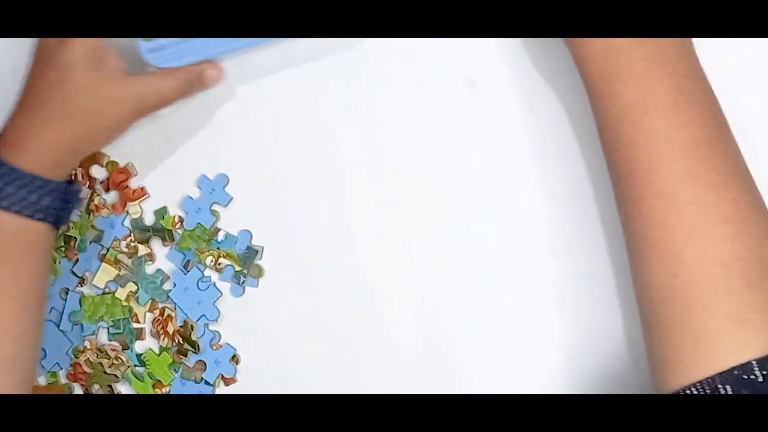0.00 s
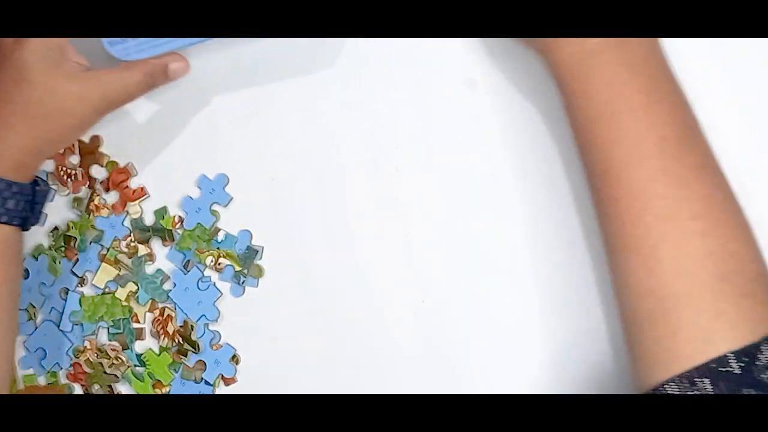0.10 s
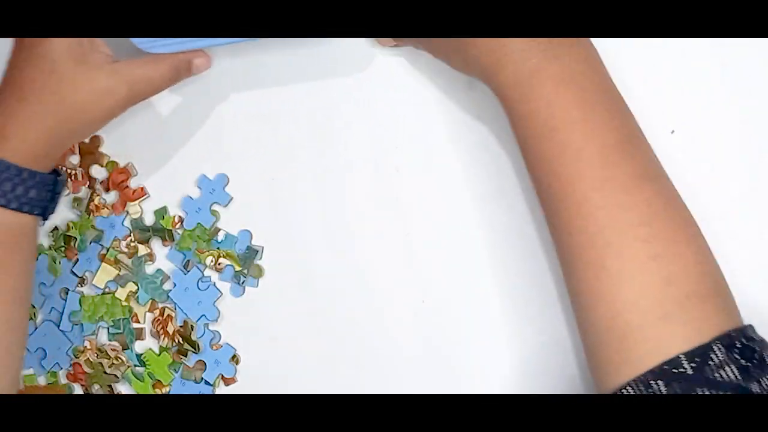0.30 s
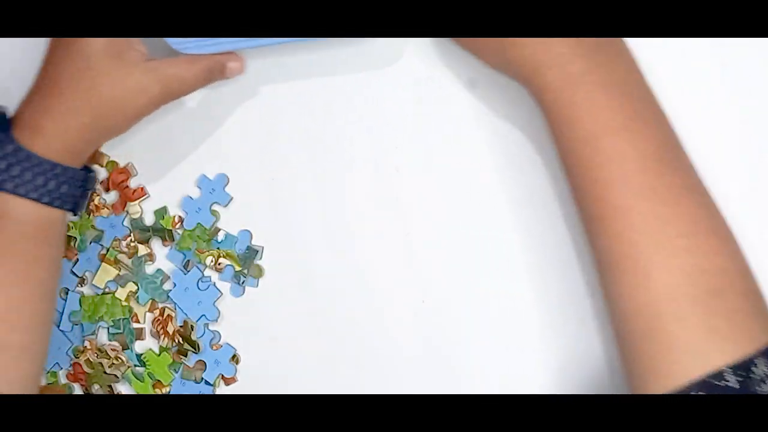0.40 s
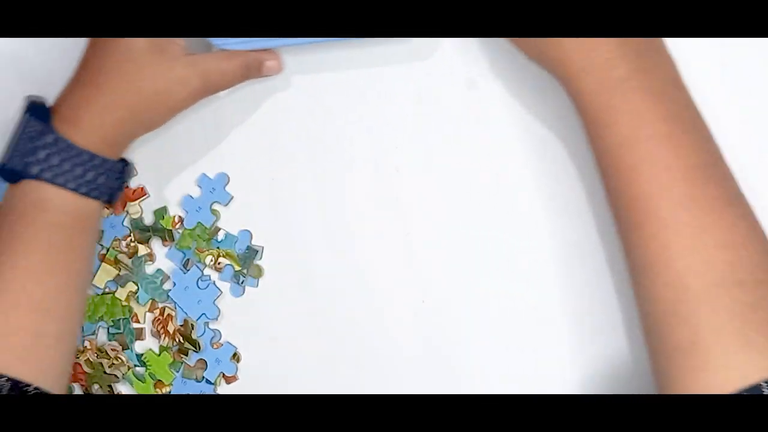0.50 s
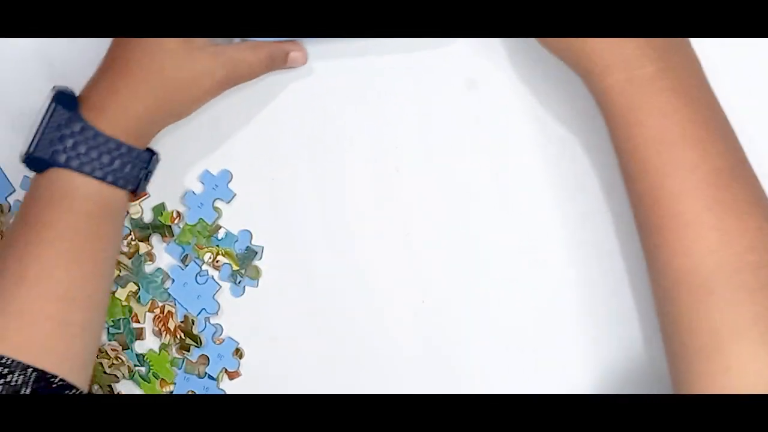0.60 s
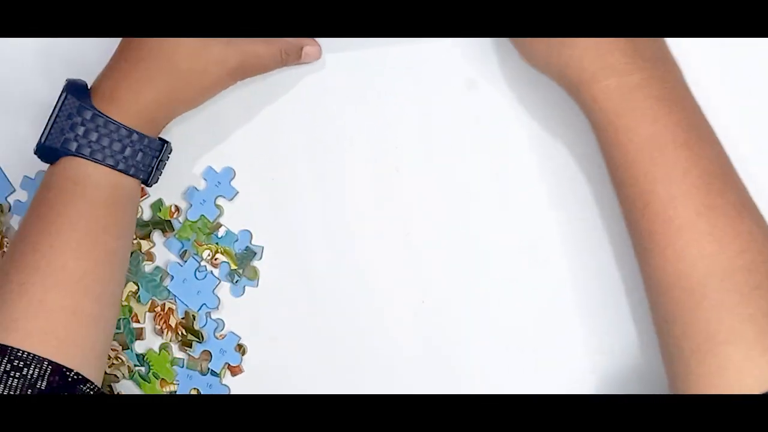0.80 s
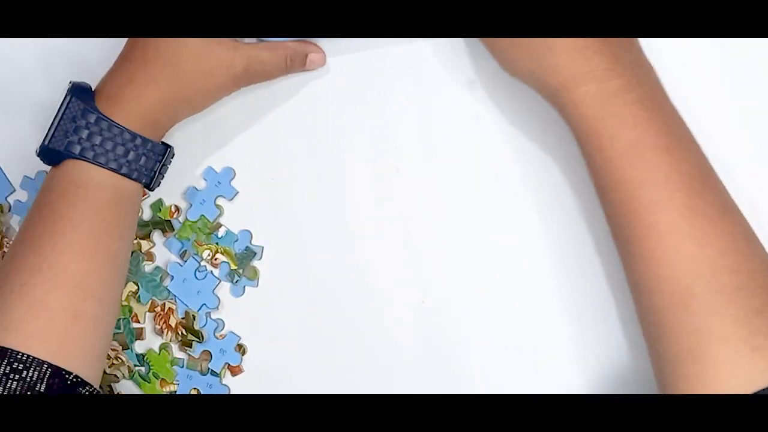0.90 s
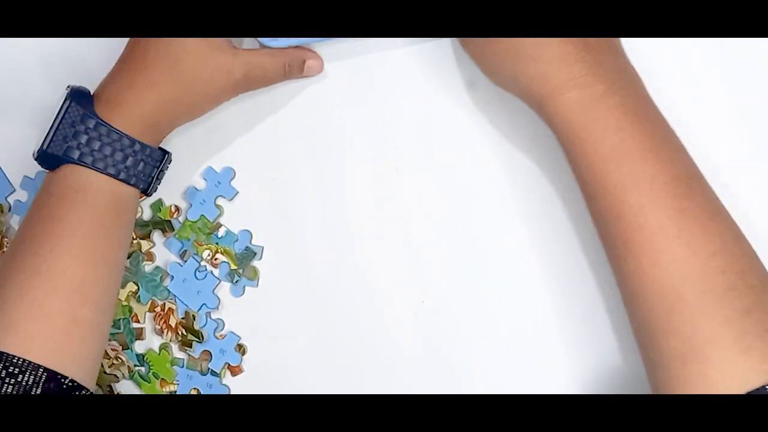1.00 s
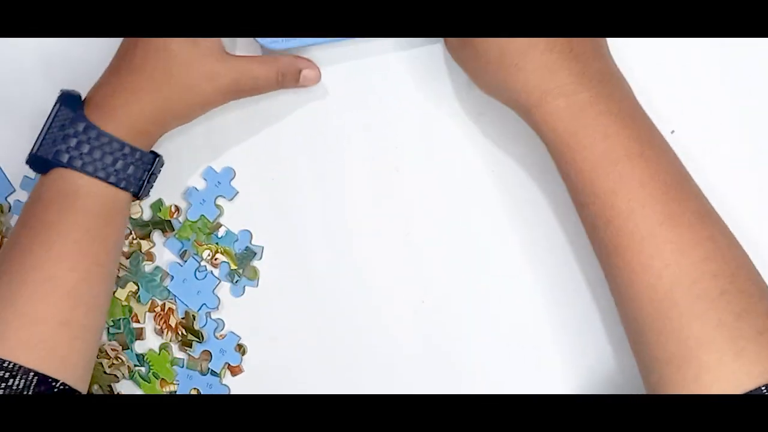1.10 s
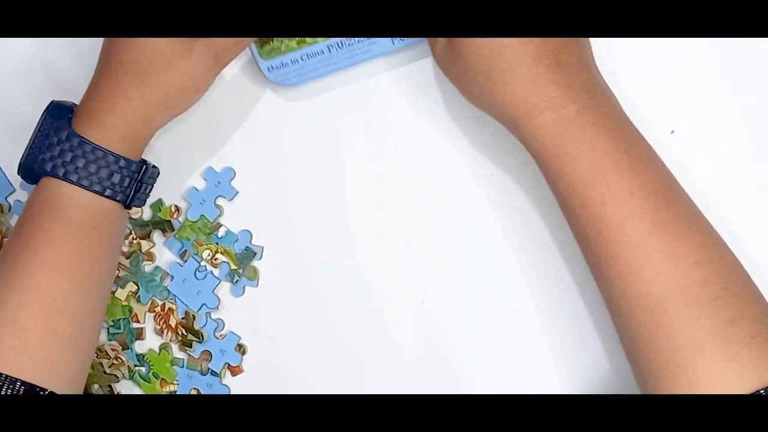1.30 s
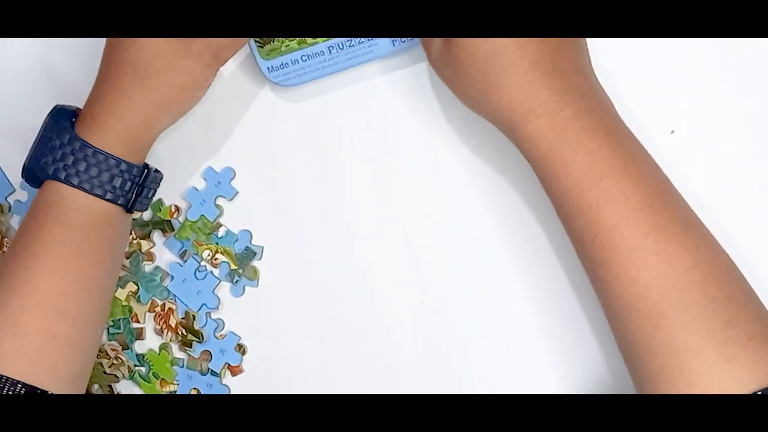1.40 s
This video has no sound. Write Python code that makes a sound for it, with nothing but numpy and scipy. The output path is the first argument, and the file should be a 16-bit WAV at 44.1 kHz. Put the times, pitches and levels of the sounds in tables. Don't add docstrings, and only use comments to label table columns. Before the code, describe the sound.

Plastic box snaps open with five sharp, ringing cracks at a table in a bare room

```python
import sys
import numpy as np
from scipy import signal
from scipy.io import wavfile
from scipy.ndimage import uniform_filter1d

SR = 44100
rng = np.random.default_rng(int(sys.argv[2]) if len(sys.argv) > 2 else 0)


def transcribe(u):
    v = np.clip(np.atleast_2d(u).T, -1, 1)
    q = np.round(v * 32767).astype(np.int16)
    wavfile.write(sys.argv[1], SR, q)


def elevation(decibels):
    levels = np.asarray(decibels, float)
    return 10 ** (levels / 20)


N = 66150


def evened(x):
    return x / np.sqrt(np.mean(x ** 2) + 1e-20)


def read(points, hz):
    f, value = np.transpose(points)
    return np.interp(np.log(hz + 1), np.log(f + 1), value)


def add(mix, s, sound):
    part = mix[round(s * SR):][:len(sound)]
    part += sound[:len(part)]


def colour(x, points, tilt_db=0.):
    hz = abs(np.fft.fftfreq(4096, 1 / SR))
    octaves = np.log2(np.clip(hz, 150, SR) / 2000)
    log_gain = np.log(elevation(read(points, hz) + tilt_db * octaves))
    minimum_phase = np.exp(np.conj(signal.hilbert(log_gain)))
    taps = np.fft.ifft(minimum_phase).real[:2048]
    return signal.fftconvolve(x, taps / np.linalg.norm(taps))


def grit(n):
    grain_db = 4.5 * np.minimum(rng.exponential(1, n), 3.5)
    return evened(rng.standard_normal(n) * elevation(grain_db))


# frequency in Hz, level in dB per Hz.
HISS_COLOUR = [(90, -39), (200, -11), (900, -13), (3200, -21.5), (6800, -9.5), (9400, -17), (12500, -19.5),
               (15600, -24.5)]
HISS_DB = -69


def hiss():
    flicker_db = evened(uniform_filter1d(rng.standard_normal(N), 1500))
    settle = SR // 10
    noise = colour(rng.standard_normal(N + settle), HISS_COLOUR)[settle:][:N]
    return elevation(HISS_DB + flicker_db) * noise


# frequency in Hz, width in Hz, level in dB.
TABLE_MODES = [(53, 17, -3), (72.9, 74, 4.5), (130, 88, -6.5), (210, 39, -10.5), (29.5, 7.5, 4)]
# time in seconds, level in dB.
HAND_WEIGHT = [(0, -9), (.17, -9), (.3, -5), (1.15, 1), (1.23, -8), (1.36, -3)]
RUMBLE_DB = -61


def table_rumble():
    force, rumble = rng.standard_normal(N), np.zeros(N)
    for hz, width_hz, db in TABLE_MODES:
        b, a = signal.iirpeak(hz, hz / width_hz, SR)
        mode = signal.lfilter(b, a, signal.lfilter(b, a, force))
        rumble += elevation(db) * evened(mode)
    weight_db = np.interp(np.arange(N) / SR, *np.transpose(HAND_WEIGHT))
    return evened(rumble) * elevation(RUMBLE_DB + weight_db)


# start in seconds, level in dB, pitch in Hz, time to fall 60 dB in seconds.
THUMPS = [(0.178, -44.5, 168, 0.095), (0.189, -44, 78, 0.2), (0.237, -42, 207, 0.12),
          (0.251, -38.5, 260.5, 0.15), (.248, -41, 357, 0.12), (0.265, -37.5, 130, 0.16),
          (0.252, -37, 57.5, 0.18), (0.3, -40.5, 69.5, 0.3), (0.431, -49.5, 53, 0.3),
          (0.624, -47.5, 210, 0.18), (0.661, -52.5, 162, 0.19), (0.744, -56, 158, 0.18),
          (0.78, -45, 53.4, 0.58), (0.887, -47.5, 53, 0.75), (0.948, -44.5, 247, 0.095),
          (0.974, -40, 65.5, 0.15), (1.142, -52, 49.4, 0.21), (1.3, -61.5, 70, 0.14),
          (1.324, -60.5, 264, 0.086), (1.419, -63, 102, 0.17)]


def table_thumps():
    out, t = np.zeros(N), np.arange(SR // 2) / SR
    for s, level_db, hz, t60 in THUMPS:
        onset = 1 - np.exp(-t * hz / 0.3)
        add(out, s, elevation(level_db - 60 * t / t60) * onset * np.sin(2 * np.pi * hz * t))
    return out


# frequency in Hz, time to fall 60 dB in seconds.
ROOM_DECAY = [(150, .25), (500, 0.35), (1300, 0.41), (3500, 0.38), (7000, 0.3), (14000, 0.17)]
STANDING_HZ = [518, 945, 1040, 1105, 1155, 1325, 1408, 2008, 2051, 2450, 2596, 1790, 4881, 7585]
# level in dB, time to fall 60 dB in seconds.
STANDING = [(1.5, 0.31), (2.5, .45), (3, 0.45), (-3, 0.45), (-10, .4), (-7.5, .55), (-0.5, .5), (1, 0.45),
            (-5, .35), (7.5, 0.18), (-8, 0.68), (3, 0.34), (7.5, 0.23), (-20.5, .25)]
STANDING_DB, WALL_S = -15.5, .0031
NEAR_T60_S, FAR_DB, BUILD_S = 0.069, -10.5, 0.0015


def room_tail():
    echoes = np.zeros(SR // 2)
    at = np.arange(0, len(echoes) - 10, 10)
    echoes[at + rng.integers(0, 10, len(at))] = rng.choice([-1., 1.], len(at))
    hz, t, bands = signal.stft(echoes, SR, nperseg=256)
    decay_db = FAR_DB - 60 * t / read(ROOM_DECAY, hz)[:, None]
    far = signal.istft(bands * elevation(decay_db), SR, nperseg=256)[1][:len(echoes)]
    t = np.arange(len(echoes)) / SR
    near = echoes[::-1] * elevation(-60 * t / NEAR_T60_S)
    tail = (far + near) * (1 - np.exp(-t / BUILD_S))
    waves = np.zeros(len(t))
    for k, (hz, (db, t60)) in enumerate(zip(STANDING_HZ, STANDING)):
        waves += elevation(db - 60 * t / t60) * np.sin(2 * np.pi * hz * (t - WALL_S * k))
    waves *= elevation(STANDING_DB) / np.linalg.norm(waves)
    tail = tail / np.linalg.norm(tail) + waves * (1 - np.exp(-t / WALL_S))
    return tail / np.linalg.norm(tail)


# start in seconds, length in seconds, level in dB, growth in dB,
# brightness in dB per octave.
RUBS = [
    (0.175, .024, -61.5, -12, 9),
    (0.202, 0.025, -52.5, 6, 10),
    (0.23, .015, -42, 2.5, 3),
    (0.768, 0.055, -31.5, 21, 0.5),
    (.81, 0.034, -38, -6, 2.5),
    (1.09, 0.021, -52, 4.5, -1.5),
    (1.255, 0.049, -59, -2, 0),
    (1.446, 0.0547, -62.5, 7, 22.5),
    (1.472, 0.028, -64, -2.5, -4),
]
# frequency in Hz, level in dB per Hz.
SKIN = [(180, -9), (300, -13.5), (645, -6.5), (1300, -4), (2650, -15), (5610, -15.5), (7690, -13.5),
        (11100, -28.5), (16000, -42)]


def finger_rubs():
    out = np.zeros(N)
    for s, length, level_db, growth_db, tilt_db in RUBS:
        u = np.arange(0, length, 1 / SR) / length
        edges = np.minimum(np.minimum(u, 1 - u) * length / .002, 1)
        stroke = grit(SR // 8)[:len(u)] * elevation(growth_db * (u - 1)) * edges
        add(out, s, elevation(level_db) * colour(stroke, SKIN, tilt_db))
    return out


# start in seconds, level in dB, brightness in dB per octave,
# length in seconds.
KNOCKS = [(0.182, -52, -2, 0.0043), (0.938, -40, -2, 0.0029), (0.948, -38, -7, 0.0079),
          (.957, -40.5, -2.5, 0.0073), (1.013, -54, -5.5, .003), (1.087, -58.5, 2.5, 0.0032),
          (1.187, -63, -5, 0.0016), (1.197, -38.5, 3, 0.0014), (1.277, -59.5, 2, 0.0019),
          (1.323, -53, -3, .001), (1.328, -51, -9.5, 0.0074), (1.385, -57, 4.5, 0.0023)]
# frequency in Hz, level in dB.
KNOCK_COLOUR = [(80, -4.5), (200, -4), (500, 4.5), (1000, 9.5), (2000, -4), (6000, -6.5), (16000, -16)]


def knocks():
    out, t = np.zeros(N), np.arange(400) / SR
    for s, level_db, tilt_db, length in KNOCKS:
        puff = grit(len(t)) * np.exp(-t / length)
        add(out, s, elevation(level_db) * colour(puff, KNOCK_COLOUR, tilt_db))
    return out


def fingers():
    direct = finger_rubs() + knocks()
    return 0.67 * direct + elevation(-0.5) * signal.fftconvolve(direct, room_tail())[:N]


LONGEST_RING_S, RING_CYCLES = 0.6, 750
PAIR_SPREAD = 0.013


def ring_mode(t, hz, db, t60):
    chance = rng.random(5)
    turns = chance[:3]
    detune = PAIR_SPREAD * np.array([0, 0.26 + 0.59 * chance[3], -.3 - 0.57 * chance[4]])
    waves = np.sin(2 * np.pi * (hz * (1 + detune[:, None]) * t + turns[:, None]))
    decay_s = min(t60, LONGEST_RING_S, RING_CYCLES / hz)
    return elevation(db - 60 * t / decay_s) * (np.array([1, .3, .3]) @ waves)


SMEAR = .4
CRACK_TILT_DB = -0.5


def snap(level_db, rattle_s, ring_db, room_db, tick, spectrum, modes, rebounds):
    t = np.arange(SR // 2) / SR
    swell = 1 - np.exp(-t / max(rattle_s, 5e-4))
    crack = grit(len(t)) * (1 - swell)
    crack[0] -= tick
    for delay_s, db in rebounds:
        crack[round(delay_s * SR)] -= tick * elevation(db)
    crack /= np.linalg.norm(crack)
    ring = sum(ring_mode(t, *mode) for mode in modes)
    ring *= np.minimum(t / max(0.42 * rattle_s, 1e-3), 1)
    tail = room_tail()
    tail = tail * swell + SMEAR * signal.fftconvolve(tail, crack)[:len(t)]
    out = colour(elevation(room_db) * tail, spectrum) + 0.88 * colour(crack, spectrum, CRACK_TILT_DB)
    first = SR // 50
    out /= np.sqrt(np.mean(out[:first] ** 2))
    add(out, 0, elevation(ring_db) * ring / np.sqrt(np.mean(ring[:first] ** 2)))
    return elevation(level_db - 11) * out


SNAP_S = [.2477, .5247, .6225, .8042, 1.1122]
# level in dB, rattle length in seconds, ring in dB, room in dB, size of first tick.
SNAPS = [
    (-14.5, 0.01, -0.5, 3.5, 4.9),
    (-12.5, 0.0066, 0.5, 3, 1.7),
    (-23, 0.0011, -0.5, 7, 3.7),
    (-18.5, 0.0042, 2.5, -5, 5.7),
    (-25.5, 0.006, 1, 7, 10.3),
]
# frequency in Hz, level in dB per Hz.
COLOURS = [
    [(90, -13), (300, -9.5), (650, -12), (1200, -9), (2300, -8), (4500, -11), (7500, -13.5), (16000, -43)],
    [(120, -32), (480, -16.5), (760, -15), (1100, -11.5), (2000, -18), (4500, -7.5), (7200, -8),
     (16000, -28.5)],
    [(90, -40), (200, -18.5), (500, -15.5), (1200, -7.5), (2000, -16), (4000, -16), (6800, -6),
     (16000, -26.5)],
    [(90, -32.5), (330, -18.5), (550, -6.5), (1100, 1.5), (2000, -13.5), (4000, -9), (6500, -16),
     (16000, -31.5)],
    [(90, -48.5), (200, -19), (550, -14.5), (1050, -8), (2000, -14), (4000, -14.5), (6500, -7),
     (16000, -26)],
]
REBOUND_OF = [0, 0, 0, 0, 0, 1, 1, 1, 1, 1, 1, 3, 3, 3, 3, 3, 4, 4, 4, 4, 4]
# delay in seconds, level in dB against the first tick.
REBOUNDS = [(.0026, -0.5), (.0068, -23), (.021, -12), (.0275, -10), (.042, -2.5), (.0018, 12), (.0033, 5.5),
            (.0048, 3), (.0056, 2), (.0143, -5), (.028, 0), (.0075, -3.5), (.0165, -10), (.021, -8.5),
            (.0255, -7.5), (.031, -14), (.004, -16), (0.017, 6.5), (0.012, -9), (.024, -4), (.032, -13)]
LID_HZ = [560, 950, 1105, 1406, 2006, 2051, 2362, 2487, 2596, 3278, 3951, 4737, 5300, 6751]
CLIP_HZ = [3009, 3817, 1036, 4307, 4554, 4883, 4971, 5582, 5848, 6300, 6684, 7110, 7585, 8818]
LIGHT_HZ = [942, 1125, 1262, 2051, 2550, 3165, 4280, 5570, 6185, 6535, 6770, 7582]
BASE_HZ = [533, 860, 942, 1203, 1157, 1330, 1475, 1825, 1905, 2350, 3424, 5076, 6207, 7020]
LAST_HZ = [530, 895, 930, 1040, 1102, 1152, 1981, 2400, 3000, 3903, 5351, 5706, 6428, 7375]
# level in dB, time to fall 60 dB in seconds.
RING_LID = [(-5, 0.086), (-6.5, .36), (-3, 0.32), (-4.5, .42), (4.5, 0.094), (-2.5, 0.17), (-2.5, 0.17),
            (-3, 0.43), (-7, .4), (-1.5, .35), (-6, .2), (-14, .22), (-5.5, .2), (-15, .2)]
RING_CLIP = [(-10, 0.18), (-11.5, .25), (-14, 0.19), (-5.5, .18), (-13, .2), (-20, .25), (-2.5, .2),
             (-21, .19), (-9.5, .15), (-4.5, 0.11), (-1, .12), (-1.5, .14), (-2, .11), (-9, .2)]
RING_LIGHT = [(-14, 0.27), (-3, 0.14), (3.5, 0.14), (-6.5, 0.19), (-4.5, 0.085), (-3, 0.2), (-2, 0.1),
              (0.5, .14), (-2, .15), (-6, .17), (-1, .15), (1.5, .15)]
RING_BASE = [(-12, 0.12), (-4.5, .08), (-3.5, .15), (-9.5, 0.19), (-16, 0.14), (-27, 0.2), (-3.5, 0.061),
             (-11.5, 0.17), (-8, .12), (-12, 0.069), (-11.5, 0.13), (-17, 0.27), (-7.5, 0.27), (-13, .2)]
RING_LAST = [(-12.5, 0.21), (0, 0.15), (-8.5, 0.34), (-10, 0.17), (-10, 0.27), (0, 0.22), (-8.5, 0.18),
             (-12.5, 0.37), (-10, 0.19), (-16, .2), (-32, .18), (-3, .15), (0, .15), (-3.5, .2)]


def snaps():
    out = np.zeros(N)
    walls = [(LID_HZ, RING_LID), (CLIP_HZ, RING_CLIP), (LIGHT_HZ, RING_LIGHT),
             (BASE_HZ, RING_BASE), (LAST_HZ, RING_LAST)]
    for k, (s, row, spectrum, wall) in enumerate(zip(SNAP_S, SNAPS, COLOURS, walls)):
        modes = [(hz, *strength) for hz, strength in zip(*wall)]
        rebounds = [rebound for rebound, of in zip(REBOUNDS, REBOUND_OF) if of == k]
        add(out, s, snap(*row, spectrum, modes, rebounds))
    return out


def scene():
    mix = hiss() + table_rumble() + table_thumps() + fingers() + snaps()
    return mix[None]


def top_cut(x):
    return signal.sosfilt(signal.butter(12, 16620, fs=SR, output="sos"), x)


# frequency in Hz, gain in dB.
MIC = [(20, -4.5), (60, 3.5), (7600, -2.5), (8300, -6), (9300, -4), (10500, 2), (11800, -6), (15500, -3.5)]
EDGE_HZ = 16000


def record(dry):
    heard = colour(dry[0], MIC)[:N]
    heard = signal.oaconvolve(heard, signal.firwin(255, EDGE_HZ, fs=SR), "same")
    return top_cut(elevation(-2.5) * heard[None])


dry = scene()
out = record(dry)
transcribe(out)
```